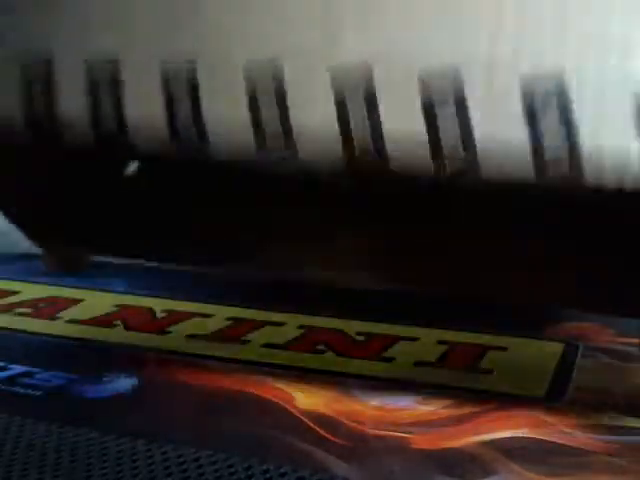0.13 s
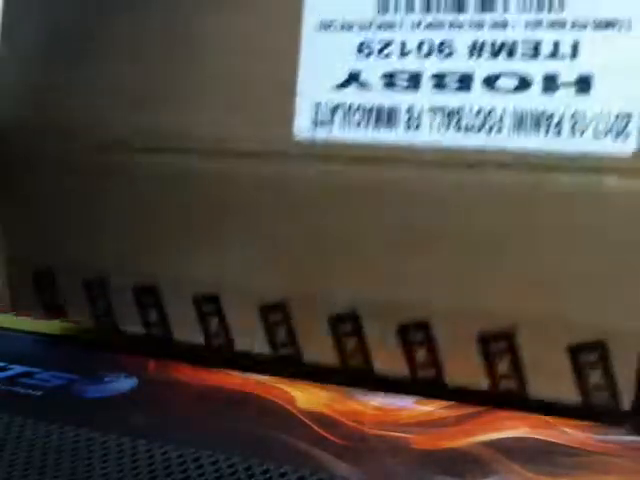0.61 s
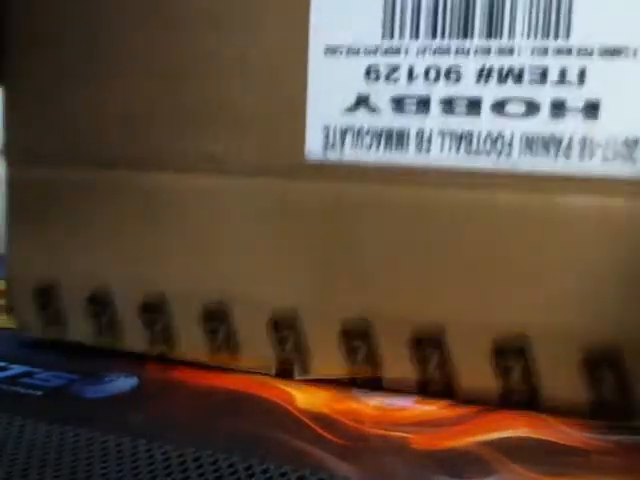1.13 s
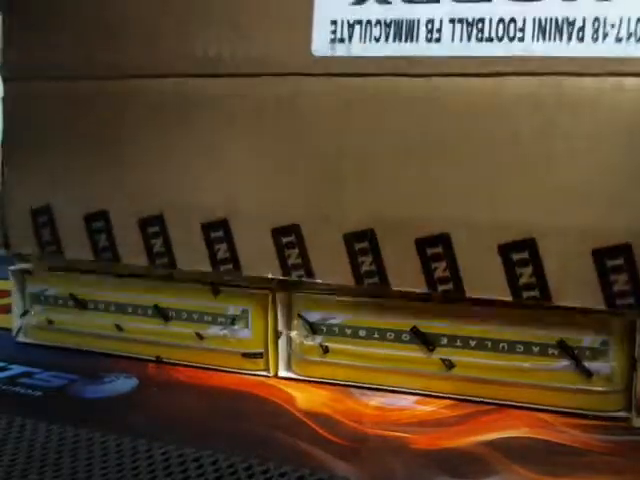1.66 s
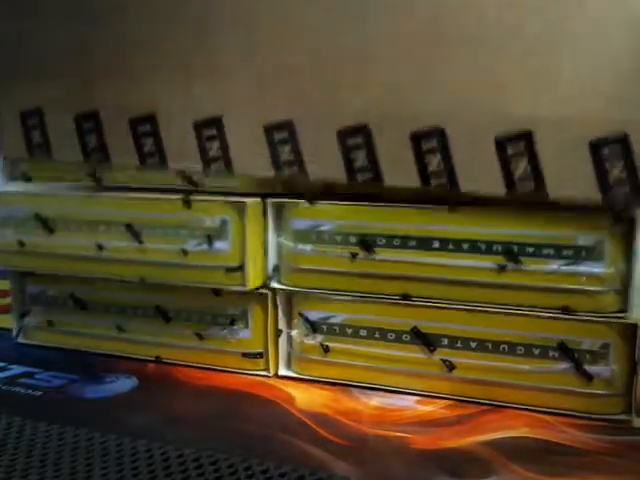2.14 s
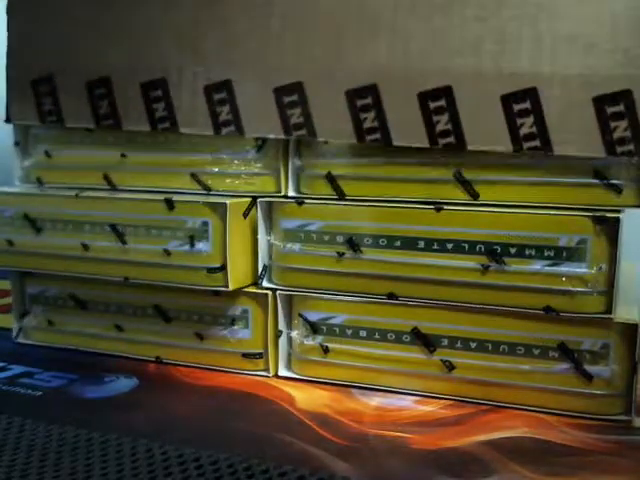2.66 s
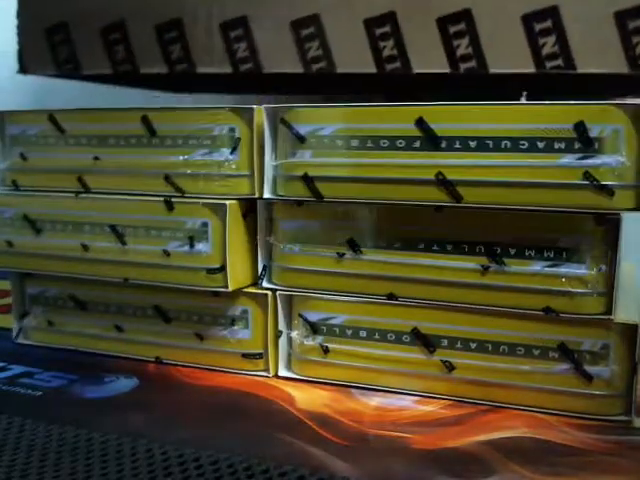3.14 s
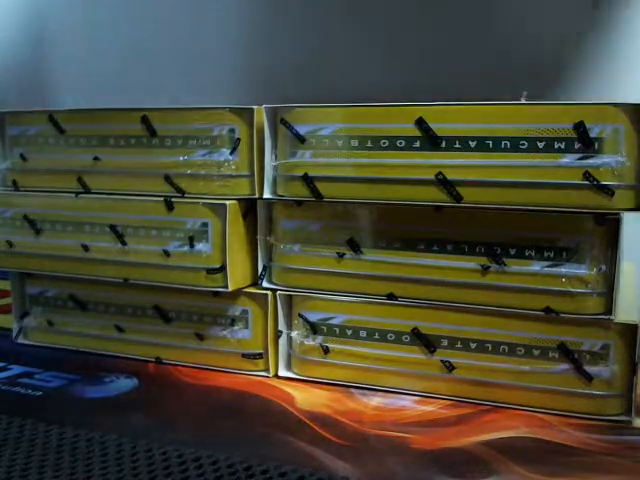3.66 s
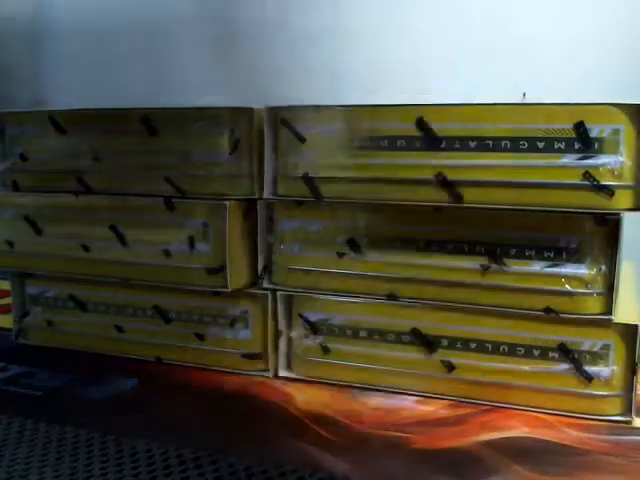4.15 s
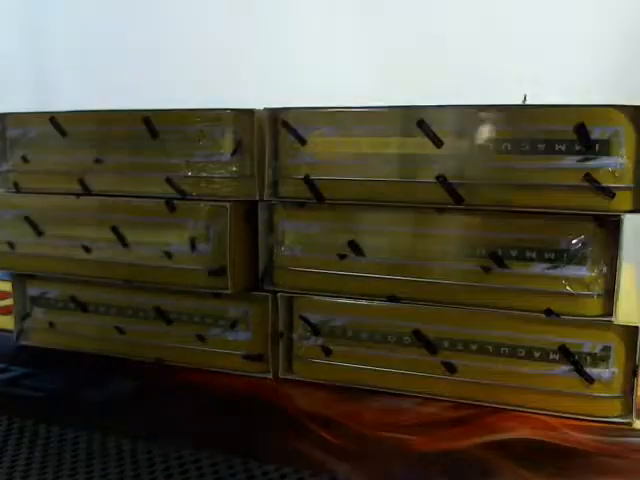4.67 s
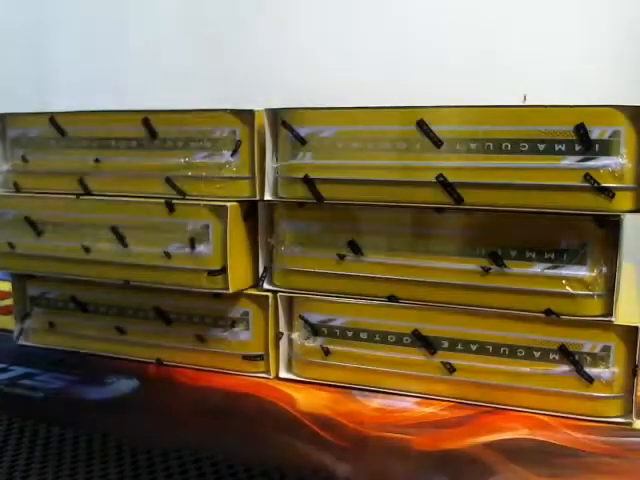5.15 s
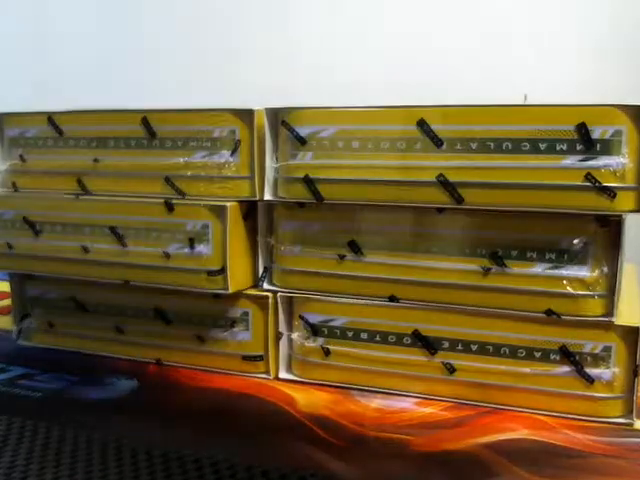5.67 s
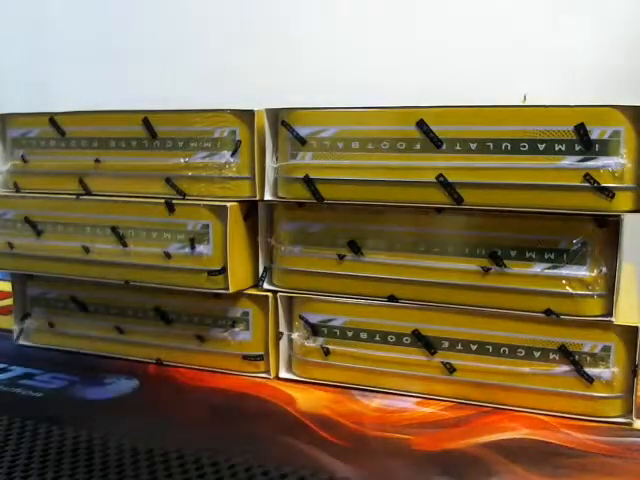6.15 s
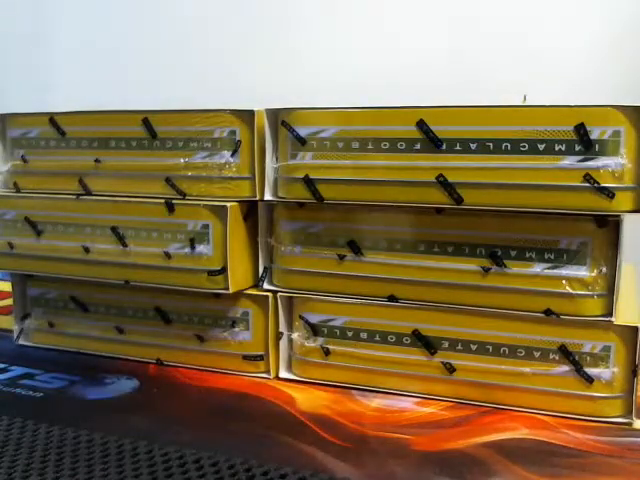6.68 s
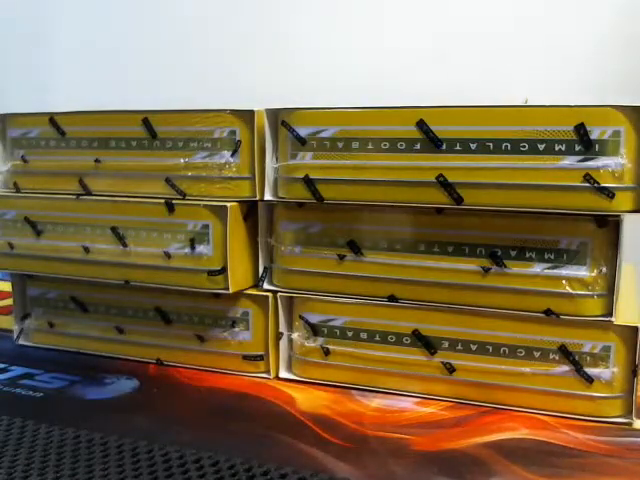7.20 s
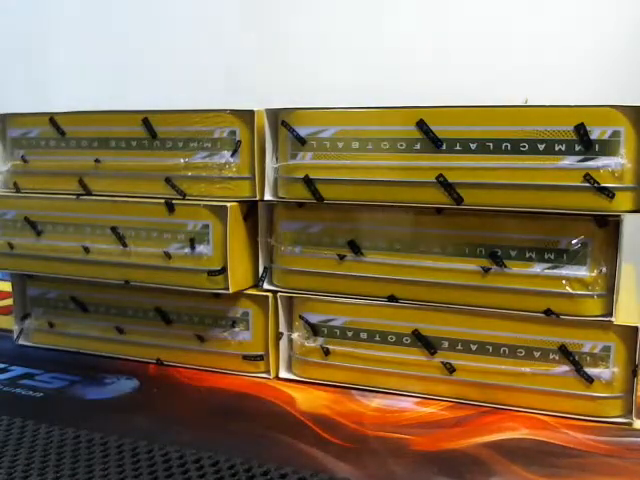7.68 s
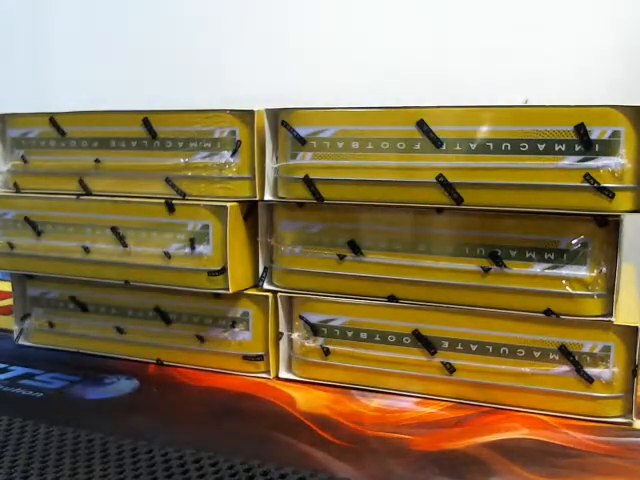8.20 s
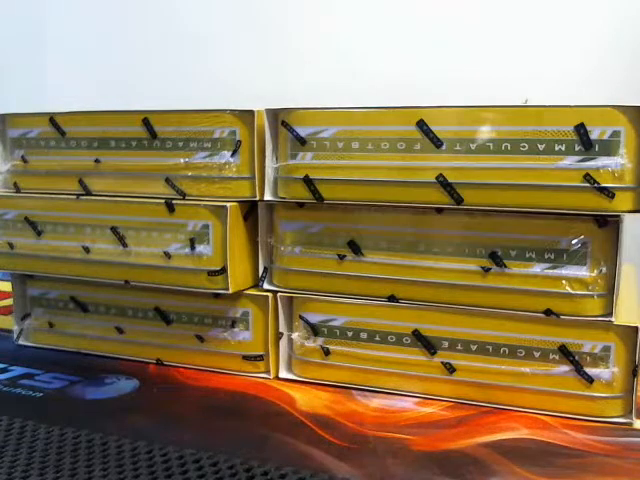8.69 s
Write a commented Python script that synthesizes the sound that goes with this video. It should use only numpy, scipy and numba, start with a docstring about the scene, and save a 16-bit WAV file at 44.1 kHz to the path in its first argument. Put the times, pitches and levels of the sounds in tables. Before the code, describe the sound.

In a small furnished room with a low machine hum and faint hiss, a hollow cardboard case is handled close to a small microphone. Gritty scraping strokes, sharp crease snaps and boomy knocks crowd the first two seconds. Softer, brighter sliding follows as the case lifts off the cartons inside, then sparse light rustles, and finally a hollow thump and clatter as the empty case is dropped, with tiny scuffs after.

```python
"""A small room hums and hisses; at once board rubs on board in gritty strokes, creases tick, a hollow case booms.
A cardboard case is turned over on a table, shaken and slid up off the cartons inside, carried away and dropped.
Rubbing is random slips of fibres filtered by the board; ticks are decaying bursts of noise.
Knocks are damped modes of the case, landings two low damped modes; decaying noise forms the room's echo."""
import sys
import numpy as np
from scipy import signal
from scipy.fft import rfft, irfft, next_fast_len
from scipy.io import wavfile
from scipy.ndimage import uniform_filter1d
from numba import njit

SR = 44100
rng = np.random.default_rng(int(sys.argv[2]) if len(sys.argv) > 2 else 0)


def how_loud(loudness_db):
    """Turn decibels into a plain amplitude multiplier (0 dB gives 1, 20 dB gives 10)."""
    steps = np.asarray(loudness_db, float) / 20
    return 10 ** steps


def int16_out(signal):
    """Quantize to a 16-bit WAV file."""
    q = np.round(np.clip(np.atleast_2d(signal).T, -1, 1) * 32767)
    wavfile.write(sys.argv[1], SR, q.astype(np.int16))


N = 388962
TIME = np.arange(N) / SR


def unit(x):
    """Normalisation: scale a signal to an rms of 1."""
    return x / np.sqrt(np.mean(x ** 2))


def colour(x, points):
    """Minimum-phase filtering: the folded cepstrum of the log gain through (f/Hz, level/dB) is causal."""
    hz, db = np.transpose(points)
    size = 4096
    bin_hz = np.arange(size // 2 + 1) * SR / size
    log_gain = np.interp(np.log(bin_hz + 1), np.log(hz), db) * np.log(10) / 20
    cepstrum = irfft(log_gain)
    cepstrum[1:size // 2] *= 2
    cepstrum[size // 2 + 1:] = 0
    response = irfft(np.exp(rfft(cepstrum)))
    return signal.fftconvolve(x, response)[:len(x)]


def walk(rate):
    """Slow random modulation: levels held 1 / rate s and slewed twice, with a spread near 1."""
    k = int(SR / rate)
    held = np.repeat(rng.standard_normal(N // k + 1), k)
    return 0.89 * uniform_filter1d(uniform_filter1d(held, k), k)[:N]


def add(out, s, x):
    """Superposition: mix a short sound in at time s."""
    i = int(s * SR)
    out[i:i + len(x)] += x[:N - i]


# spectrum of the broad rumble: f/Hz, relative level/dB per Hz
AIR = [(15, -21), (50, -21.5), (70, -5), (101, -8), (228, -17), (285, -15), (347, -22), (500, -26),
       (800, -37.5), (1500, -66.5)]
# spectrum of the microphone hiss: f/Hz, relative level/dB per Hz
MIC = [(450, -20), (750, 2), (1000, 0), (2000, -6), (3200, -8.5), (5000, -11), (6300, -14), (8000, -20),
       (10000, -24), (16000, -31)]
# steady machine tones and thin whines: f/Hz, mean rms level/dB, waver/dB (also sets the phase waver)
HUM = [(37.7, -46, .8), (75.4, -50, 2.5), (97, -54, 3.5), (118.4, -54, 3.5), (147, -56, 3.5),
       (172, -56, 3.5), (220.7, -57, 2.5), (5389, -86, .3), (8000, -80, .1)]
AIR_DB, MIC_DB = -48, -66.5  # rms; the rumble also wavers about its level


def room_tone():
    """Stationary background: coloured noises plus sinusoids of wandering level and phase."""
    air = how_loud(AIR_DB) * unit(colour(rng.standard_normal(N), AIR)) * how_loud(1.5 * walk(3.))
    air = air + how_loud(MIC_DB) * unit(colour(rng.standard_normal(N), MIC))
    for hz, db, waver_db in HUM:
        level = np.sqrt(2) * how_loud(db + waver_db * walk(7.4))
        phase = 2 * np.pi * hz * TIME + 1.0 * waver_db * walk(6.)
        air = air + level * np.sin(phase)
    return air


# rubbing strokes: start t/s, length t/s, initial gain level/dB, change over the stroke/dB, panel resonance f/Hz
STROKES = [(0.0, 0.089, -61, -12, 3560), (0.076, 0.05, -55.5, -3, 4450), (0.162, 0.041, -56, 4, 4140),
           (0.201, 0.021, -47, -0.5, 3980), (0.247, 0.057, -55.5, -4, 3100),
           (0.305, 0.14, -70.5, 18.5, 2940), (0.42, 0.031, -29.5, -7, 3970), (0.517, 0.046, -35, -1, 3730),
           (0.571, 0.12, -40, -1.5, 3600), (0.687, 0.1, -57, 14, 3200), (0.788, 0.2, -47, -1, 3000),
           (0.958, 0.067, -42, 1, 3220), (1.032, 0.073, -48, 9, 2870), (1.12, 0.054, -37.5, -1.5, 3900),
           (1.214, 0.073, -38.5, 0.5, 4000), (1.294, 0.076, -47, -1.5, 3320),
           (1.366, 0.072, -43.5, 2, 3550), (1.452, 0.12, -37.5, -6.5, 3770), (1.568, 0.17, -39, -2, 4280),
           (1.765, 0.069, -42.5, 4, 5100), (1.87, 0.061, -43, -1.5, 4240), (1.952, 0.054, -40.5, -4, 4340),
           (2.037, 0.059, -45, -4, 4500), (2.116, 0.055, -46.5, -2.5, 3770),
           (2.166, 0.059, -48, -1.5, 4530), (2.235, 0.047, -54, -2.5, 3930), (2.297, 0.11, -60, 1, 4570),
           (2.391, 0.13, -48, 0, 5170), (2.548, 0.058, -43.5, -2.5, 5400), (2.651, .13, -48.5, -3, 4500),
           (2.808, 0.078, -65, 4.5, 3660), (2.878, .025, -56.5, -3, 3700), (2.914, .025, -53.5, -2.5, 3620),
           (2.942, 0.076, -60, -5, 3040), (3.028, 0.17, -76, -3, 4180), (3.228, 0.041, -69.5, -3, 3900),
           (3.51, 0.23, -82, 7, 3000), (3.65, 0.22, -57.5, 0.5, 3960), (3.848, 0.19, -52, -1, 3020),
           (4.035, 0.026, -48, 2, 3020), (4.081, 0.05, -59, -7, 3260), (4.128, 0.055, -40.5, -5, 3360),
           (4.213, 0.099, -60.5, -9, 3360), (4.265, 0.17, -70, 12.5, 3430), (4.426, 0.009, -45, -14, 4000),
           (4.444, 0.066, -63, -9, 3000), (4.509, 0.053, -58, -3.5, 2700), (4.574, 0.1, -60, -4.5, 2970),
           (4.66, 0.17, -59, 1.5, 3500), (4.834, 0.1, -59, -2.5, 3370), (4.922, 0.033, -57, -0.5, 2900),
           (4.971, 0.075, -61.5, 1.5, 3300), (5.035, 0.14, -55.5, -1, 4340),
           (5.557, 0.13, -60.5, -6.5, 3600), (5.817, 0.21, -66, -5.5, 4400),
           (6.223, 0.069, -65.5, -3, 4570), (6.745, 0.059, -64, 3.5, 3030), (6.806, 0.048, -59.5, -9, 3570),
           (6.87, 0.065, -74, -2, 4050), (7.174, 0.11, -32, -22.5, 2470), (7.286, 0.16, -45.5, -20, 2470),
           (7.425, 0.094, -47.5, -16.5, 2900), (7.932, 0.044, -75.5, -1, 2010),
           (7.977, 0.083, -66, 3, 1870), (8.06, 0.055, -56, 7.5, 1850), (8.122, 0.12, -51, -18.5, 1960),
           (8.206, 0.15, -72, 4, 2460), (8.3, 0.13, -58, -1, 4070), (8.436, 0.12, -64, -4, 2670),
           (8.547, 0.077, -60, -6.5, 2700), (8.623, 0.19, -62.5, -6, 2950)]
# a stroke that sags by 7 dB or more bites at once; the others ease in over a share of their length, the full
# share once they swell
ATTACK_S, SWELL_SHARE = 0.0067, 0.42
RELEASE_S = 0.09  # time to fall 60 dB


def strokes():
    """Friction envelope: strokes take hold, swell or sag, let go; overlaps blend pitch, the louder counting more."""
    gain, pitch = np.full(N, 1e-7), np.full(N, 1e-7 * 3000)
    for s, length, db, change_db, hz in STROKES:
        t = TIME[:int((length + .15) * SR)]
        attack_s = ATTACK_S + SWELL_SHARE * length * np.clip((change_db + 7.0) / 8, 0, 1)
        level = how_loud(db + change_db * np.minimum(t / length, 1))
        onset = np.sin(np.pi / 2 * np.minimum(t / attack_s, 1)) ** 2
        release = 1000. ** (-np.maximum(t - length, 0) / RELEASE_S)
        stroke = level * onset * release
        add(gain, s, stroke)
        add(pitch, s, stroke * hz)
    return gain, pitch / gain  # pitch is averaged, weighted by loudness


def fibres(rate, scatter_db, flicker_db, flicker_hz):
    """Stick-slip: fibres catch and let go at random moments, some harder than the rest, in bunches."""
    caught = rng.random(N) < rate / SR
    strength = how_loud(scatter_db * np.minimum(rng.exponential(size=N), 4.5))
    slips = caught * rng.standard_normal(N) * strength
    return slips * how_loud(flicker_db * walk(flicker_hz))


def patchy(x, flicker_db, flicker_hz):
    """Independent band modulation: board patches catch in turn, so each half-octave flickers on its own."""
    size = next_fast_len(N)
    spectrum = rfft(x, size)
    centres = np.arange(9, 13.6, .5)  # octaves above 1 Hz
    octave = np.log2(np.arange(size // 2 + 1) * SR / size + 1)
    octave = np.clip(octave, centres[0], centres[-1])
    out = np.zeros(N)
    for centre in centres:
        weight = np.clip(1 - 2 * np.abs(octave - centre), 0, 1)
        out += irfft(spectrum * weight, size)[:N] * how_loud(flicker_db * walk(flicker_hz))
    return unit(out)


@njit
def resonance(x, hz, sharpness):
    """Time-varying resonance: a state-variable band-pass whose centre moves."""
    y, band, low = np.empty(len(x)), 0., 0.
    for i in range(len(x)):
        g = np.tan(np.pi * hz[i] / SR)
        v = (band + g * (x[i] - low)) / (1 + g * (g + 1 / sharpness))
        band, low, y[i] = 2 * v - band, low + 2 * g * v, v / sharpness
    return y


# panel modes: share of the main resonance, level/dB
PANEL = [(.62, -3), (1.0, 1), (1.35, -4)]


def panel_ring(slips, panel_hz):
    """Plate resonance: the free part of the panel rings higher or lower as hands and edges move."""
    soft = colour(slips, [(6500, 0), (9000, -16), (16000, -75)])
    ring = np.zeros(N)
    for share, db in PANEL:
        centre_hz = np.clip(share * panel_hz * (1 + 0.1 * walk(15.)), 300, 12000)
        ring += how_loud(db) * resonance(soft, centre_hz, 6.)
    return patchy(unit(ring / (panel_hz / 4000) ** 2.68), 4.7, 45.)


def squeaks(rate, low_hz, high_hz, cycles, scatter_db):
    """Short tone bursts: flakes of liner chatter for a set number of cycles, each at its own gliding pitch."""
    out, t = np.zeros(N), TIME[:SR // 25]
    for when, pitch, glide, size in rng.random((int(rate * N / SR), 4)):
        hz = low_hz * (high_hz / low_hz) ** np.sqrt(pitch)
        turn = np.minimum(t * hz / cycles, 1)
        level = how_loud(-scatter_db * np.log(size + 0.015))
        tone = np.sin(2 * np.pi * cycles * turn * (1 + 0.17 * (glide - .5) * turn))
        add(out, when * N / SR, level * np.sin(np.pi * turn) ** 2 * tone)
    return unit(out)


# modes of the hollow case, before rumble and knocks weight and tune them:
# f/Hz, level/dB, ring time factor
CASE = [(140, 8.5, 0.38), (169, -27, 0.29), (206.6, -10.5, 0.85), (245, 0.5, 0.92), (284.8, 8.5, 0.55),
        (346.7, -4.5, 1.05), (419.3, -1, 0.69), (506.4, -4, 0.91), (586.7, -13, 1.07), (761, -14.5, 0.84),
        (680, -22, 0.94), (845, -21, 1.1), (915, -14, 1.07), (990, -21.5, 0.97), (1170, -19.5, 1)]


def case_rumble():
    """Modal response by convolution: coarse slips shake the damped modes of the hollow case."""
    shake = fibres(1500., scatter_db=1.2, flicker_db=2.2, flicker_hz=30.)
    t = TIME[:SR // 5]
    ring = np.zeros(len(t))
    for hz, db, k in CASE:
        level = how_loud(db - 4.6 * np.log2(hz / 250))
        ring += level * np.cos(2 * np.pi * hz * t) * 1000. ** (-t / (0.15 * k))
    rumble = signal.fftconvolve(shake, ring)[:N]
    # the rumble keeps to the low middle: neither the deepest thud nor the click of each slip comes through
    return unit(colour(rumble, [(60, -25), (125, 0), (1000, 0), (2500, -35), (9000, -90)]))


# spectra of the board's treble, middle and top: f/Hz, relative level/dB per Hz
GRIT = [(880, -16.5), (1500, -6), (1780, -7.5), (2060, 0), (2550, -4), (3320, -1.5), (3920, -3),
        (4250, -10), (5290, -1.5), (7030, -8.5), (9000, -18), (11700, -42), (19800, -120)]
RASP = [(350, -29), (600, -4.5), (950, -8), (1400, -3), (2100, -4.5), (2900, -16.5), (5000, -32.5),
        (12000, -61)]
HISS = [(5500, 1.5), (7500, 18), (8460, 18.5), (10000, 18), (10600, 13.5), (14100, 0.5), (15800, -12),
        (16600, -66)]
# balance of the rubbing, relative to the grit (the rasp also follows the panel's size):
# t/s, rasp level/dB, fine hiss level/dB, hollow rumble level/dB
BALANCE_DB = [(0.0, 0, -15, 9.5), (.45, 3, -9, 5), (.6, 2, -12, 2.5), (.8, -3, -8, 15.5),
              (1.2, -5, -13.5, 5.5), (1.5, -5, -6.5, 5), (1.8, -11, -10, 2.5), (2.2, -7, -10.5, 10),
              (2.6, -22, -8, 1), (3.0, -13, -9.5, 15.5), (3.8, -29, -11, 1), (4.3, -20, -10, 7.5),
              (4.55, -5.5, -9, 7.5), (4.9, 4, -12, -0.5), (5.6, 9, -12, 6), (6.8, -14, -13, -24),
              (7.2, -3.5, -13.5, 18.5), (7.5, -4.5, -11, 14), (7.95, 8.5, -31, 12), (8.22, -18, -40, 4.5),
              (8.33, 1.5, -13.5, -7), (8.82, -11, -27, 7)]
RASP_DB_PER_OCTAVE = -24  # a larger, lower panel rasps more


def rubbing():
    """Source-filter principle: one stream of slips excites treble, middle and top; another shakes the case."""
    gain, panel_hz = strokes()
    s, *balance_db = np.transpose(BALANCE_DB)
    rasp_gain, hiss_gain, rumble_gain = (how_loud(np.interp(TIME, s, db)) for db in balance_db)
    rasp_gain = rasp_gain * how_loud(RASP_DB_PER_OCTAVE * np.log2(panel_hz / 3000))
    slips = unit(fibres(5000., scatter_db=-0.5, flicker_db=0.5, flicker_hz=158.0))
    crackles = unit(fibres(300., scatter_db=2., flicker_db=3., flicker_hz=8.))
    # lone crackles are bright
    grit = unit(colour(slips + how_loud(-11) * crackles, GRIT))
    rasp = unit(colour(slips + how_loud(-20) * crackles, RASP))
    hiss = unit(colour(slips + how_loud(-5.5) * crackles, HISS))
    panel = panel_ring(slips, panel_hz)
    # a small stiff panel thins the lower grit
    small = panel_hz / 4000
    thinning = np.clip(1.2 * (small - .75), 0, 1)
    grit = grit - thinning * resonance(grit, np.full(N, 2600.), 0.92)
    # each band catches unevenly on its own
    grit = patchy(grit, 3.5, 30.)
    rasp = patchy(rasp, 5.9, 30.)
    hiss = hiss * how_loud(2.9 * walk(25.))
    chatter = how_loud(-5) * squeaks(250., low_hz=3000., high_hz=6600., cycles=20., scatter_db=2.8)
    # a large free panel dulls the grit
    grit = grit * np.minimum(small, 1) ** 0.85 + how_loud(-2.0) * panel + chatter
    return gain * (grit + rasp_gain * rasp + hiss_gain * hiss + rumble_gain * case_rumble())


# creases and edges that snap: t/s, nominal peak level/dB, low part relative level/dB
TICKS = [(0.1259, -31, -26), (0.1603, -23.5, -21), (.173, -40, -28), (0.1826, -26, -10), (.3473, -34, -18),
         (0.4236, -28, -19), (.4285, -23, 0), (0.4315, -8.5, -4), (0.434, -22, -12), (.44, -13, -1),
         (.4484, -16, -6), (0.464, -19.5, -16), (.5235, -25, -15), (0.5315, -15, -11), (.514, -34, -20),
         (0.5683, -16, -20), (.627, -25, -49), (.686, -31, -20), (.843, -26, -35), (0.6738, -21.5, -2),
         (0.7865, -19, -2), (.976, -25, -1), (1.0015, -13, -29), (1.059, -37, 6), (1.09, -34, -11),
         (1.1173, -2.5, -20), (1.1333, -11, -21), (1.1904, -24, 10), (1.231, -29, -23), (1.4604, -21, -24),
         (1.472, -18, -25), (1.495, -25, -19), (1.603, -30, -16), (1.6744, -22.5, -0.5), (1.781, -32, 1),
         (1.791, -27, -20), (1.818, -24, -30), (1.74, -32, -45), (1.8823, -34, -3), (1.912, -26, -45),
         (1.963, -28, -17), (1.982, -26, -20), (2.052, -33, -28), (2.06, -31, -40), (2.133, -31, 5),
         (2.149, -31, -47), (2.249, -35, -47), (2.257, -42, -50), (2.275, -42, -48), (2.4555, -42, -41),
         (2.564, -39, -30), (2.576, -31, -30), (2.612, -19.5, -33), (2.787, -38, -35), (2.889, -44, -3),
         (2.921, -42, -20), (2.958, -20, -22), (3.001, -30.5, -25), (3.01, -32, -7), (3.1033, -36, -28),
         (3.355, -65, -38), (3.596, -43, -25), (3.677, -46, -35), (4.0544, -27, -33.5), (4.134, -21, -18),
         (4.431, -21, -15), (4.5145, -44, -25), (4.5297, -33, -20), (4.611, -33, -25), (4.932, -35, -24),
         (4.947, -34, -26), (5.571, -27, -26), (5.66, -46, -35), (5.695, -44, -35), (5.826, -45, -39),
         (6.275, -42, -31), (6.897, -49, -35), (7.178, -21, -3), (7.2915, -35, -8), (7.433, -45, 0),
         (8.551, -60, 5)]
SPRAY_T60_S = 0.033
CREST_DB = 10  # nominal peak of a snap over its rms


def ticks():
    """Impulsive excitation: a snap and a spray of noise; a blunt edge gives more middle and less top."""
    high, low, top = np.zeros(N), np.zeros(N), np.zeros(N)
    t = TIME[:SR // 8]
    for s, db, low_db in TICKS:
        snap = 3.6 * 1000. ** (-t / 0.000095)
        noise = 0.48 * rng.standard_normal(len(t)) * 1000. ** (-t / SPRAY_T60_S)
        spray = how_loud(db) * (snap + noise)
        add(high, s - .0005, spray)
        add(low, s - .0005, spray * how_loud(low_db))
        add(top, s - .0005, spray * how_loud(-25 - 0.37 * low_db))
    white = rng.standard_normal(SR)  # gauges each filter's gain
    out = np.zeros(N)
    for x, points in ((high, GRIT), (low, RASP), (top, HISS)):
        out += colour(x, points) / np.std(colour(white, points))
    return out * how_loud(-CREST_DB)


# the case lands on table or floor: t/s, peak level/dB
THUDS = [(.426, -40), (0.523, -21.5), (.656, -36), (0.901, -24), (1.065, -20), (1.1, -18), (1.143, -22),
         (1.399, -20), (1.505, -19.5), (1.78, -33), (2.133, -27), (4.428, -26), (7.178, -15), (7.215, -27),
         (7.288, -23), (7.429, -29.5)]


def thuds():
    """Damped low modes: landings thud into table or floor as two decaying sinusoids with a soft onset."""
    out, t = np.zeros(N), TIME[:SR // 3]
    tones = np.sin(2 * np.pi * 61.0 * t) + 2.4 * np.sin(2 * np.pi * 75.7 * t)
    thud = tones * 1000. ** (-t / 0.075) * (1 - np.exp(-t / 0.0029))
    for s, thud_db in THUDS:
        add(out, s - .0015, how_loud(thud_db) * thud / np.max(np.abs(thud)))
    return out


# knocks on the case: t/s, peak level/dB, favoured pitch f/Hz, ring time t/s before each mode's factor
KNOCKS = [(0.428, -24, 137, 0.087), (0.43, -22.5, 990, 0.06), (0.539, -29, 680, 0.041),
          (.61, -42, 553, 0.043), (.65, -28, 475, 0.053), (.656, -15, 133, 0.15), (.669, -22, 294, 0.051),
          (.717, -26.5, 257, 0.07), (0.786, -16, 198, 0.05), (.789, -19.5, 608, 0.025),
          (.824, -32, 535, 0.056), (0.902, -26, 340, 0.054), (0.975, -20.5, 133, 0.079),
          (.976, -24.5, 593, 0.026), (1.001, -13, 256, 0.043), (1.059, -28, 500, 0.034),
          (1.069, -15.5, 228.5, 0.081), (1.099, -8, 143.5, 0.12), (1.117, -23.5, 990, 0.038),
          (1.141, -20, 140, .1), (1.145, -23, 520, 0.042), (1.149, -13.5, 280, 0.11),
          (1.19, -19.5, 303, 0.057), (1.19, -27, 823, 0.042), (1.196, -24, 434, 0.053),
          (1.23, -28, 242, 0.05), (1.26, -19.5, 202, 0.063), (1.274, -28, 690, 0.04),
          (1.339, -32.5, 548, 0.051), (1.354, -25.5, 249, 0.049), (1.4, -25, 287, 0.056),
          (1.413, -29, 475, 0.082), (1.442, -26, 424, 0.064), (1.447, -14.5, 283, 0.056),
          (1.497, -15, 271.7, 0.11), (1.506, -15.5, 147.9, 0.14), (1.553, -23.5, 303, 0.051),
          (1.645, -28, 251.4, 0.38), (1.69, -32.5, 419, .07), (1.781, -22.5, 245, 0.048),
          (1.835, -23.5, 297.4, 0.079), (1.9, -27, 282, 0.067), (1.962, -30.5, 475, 0.047),
          (1.966, -26, 228, 0.12), (1.99, -31, 447, .06), (2.005, -25, 258, 0.11), (2.055, -29, 296, 0.05),
          (2.134, -19.5, 262.6, 0.11), (2.479, -28, 314.3, 0.16), (2.682, -32.5, 293, 0.12),
          (2.882, -44, 1170, 0.035), (2.943, -34, 1075, 0.033), (2.946, -24, 271, 0.18),
          (3.01, -36.5, 1040, 0.032), (4.13, -28, 344, 0.11), (4.363, -34, 322, 0.06),
          (4.427, -26, 260.7, 0.083), (4.615, -37.5, 326, 0.068), (4.695, -38.5, 322, 0.082),
          (4.81, -40, 301, 0.13), (4.937, -32, 392, 0.11), (6.813, -45.5, 740, 0.056),
          (7.177, -14, 751, 0.045), (7.185, -15, 140, 0.1), (7.179, -17.5, 349, 0.12),
          (7.187, -22, 952, 0.057), (7.194, -16.5, 359, 0.12), (7.207, -16, 758, .05),
          (7.2, -11.5, 218, 0.081), (7.202, -28, 587, .05), (7.216, -13.5, 239, 0.05),
          (7.225, -20, 357, 0.05), (7.236, -22, 463, 0.062), (7.255, -27, 259, 0.099),
          (7.288, -31, 246, 0.15), (7.3, -33, 326, 0.096), (7.33, -27, 235, 0.12), (7.289, -26, 864, 0.052),
          (7.315, -29, 813, 0.062), (7.34, -25, 140, 0.068), (7.426, -22.5, 335, 0.1),
          (7.428, -35, 680, 0.063), (7.45, -37, 492, 0.079), (7.455, -28, 300, 0.14),
          (7.497, -28, 293, 0.13), (8.55, -44.5, 740, 0.068)]


def knocks():
    """Modal synthesis: each blow rings the case modes nearest its favoured pitch."""
    out, t = np.zeros(N), TIME[:SR // 3]
    hz, db, k = np.transpose(CASE)[:, :, None]
    for s, peak_db, near_hz, t60 in KNOCKS:
        level_chance, pitch_chance = rng.standard_normal((2, len(CASE), 1))
        octaves = np.log2(hz / near_hz)
        away = np.abs(octaves)
        share_db = 0.4 * db - np.minimum(60. * away, 17.) - 4.9 * away
        share_db = share_db - 3.5 * np.maximum(octaves, 0)  # soft board starves the modes above
        share = how_loud(share_db + 2.4 * level_chance)
        # the grip bends the walls: the nearest mode is tuned to the favoured pitch, before a little scatter
        bent = hz * near_hz / hz[np.argmin(away)] * (1 + 0.012 * pitch_chance)
        decay = 1000. ** (-t / (max(t60, .02) * k))
        ring = np.sum(share * np.sin(2 * np.pi * bent * t) * decay, axis=0)
        ring *= 1 - np.exp(-t * near_hz / 1.33)  # a soft contact pushes for about one cycle
        add(out, s - .0015, how_loud(peak_db) * ring / np.max(np.abs(ring)))
    return out


ROOM_T60_S, ROOM_DB = 0.43, -13.5


def room_echo(near):
    """Diffuse reverberation: convolution with exponentially decaying coloured noise."""
    t = TIME[:SR // 2]
    tail = colour(rng.standard_normal(len(t)), [(100, 10.3), (2000, 5.9), (12000, 0.5)])
    tail = tail * 1000. ** (-t / ROOM_T60_S) * (t > .004)
    echo = signal.fftconvolve(near, tail / np.sqrt(np.sum(tail ** 2)))[:N]
    return how_loud(ROOM_DB) * echo


def scene():
    """Superposition of the case, its echo in a small furnished room and the room's own tone."""
    near = rubbing() + ticks() + knocks() + thuds()
    return (near + room_echo(near) + room_tone())[None]


def roll_off(x):
    """The treble ends steeply here."""
    return signal.sosfilt(signal.butter(12, 15850, fs=SR, output="sos"), x)


def record(dry):
    """Soft saturation: a small microphone rounds the loudest peaks and sits slightly off zero."""
    offset = .0038
    mix = np.tanh(1.228 * dry) / 1.153 + offset
    return roll_off(mix)


dry = scene()
out = record(dry)
int16_out(out)
```